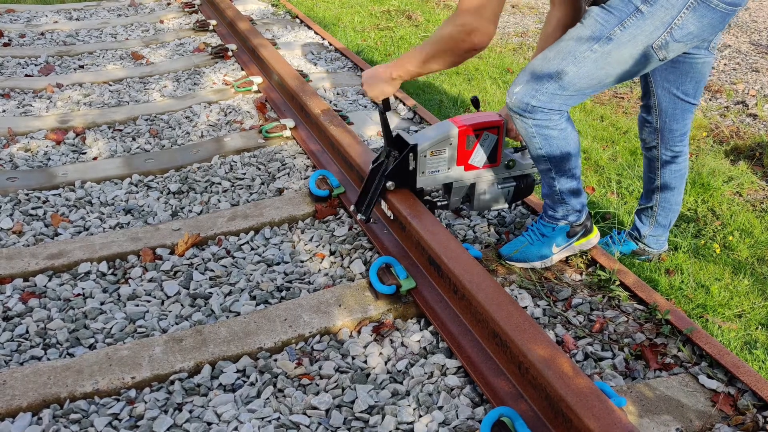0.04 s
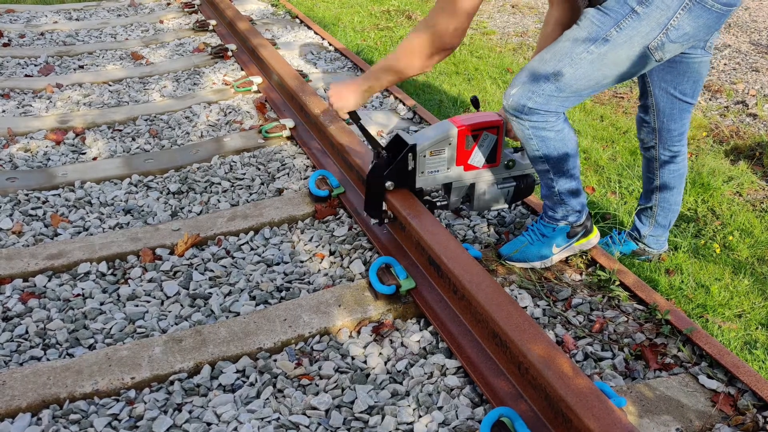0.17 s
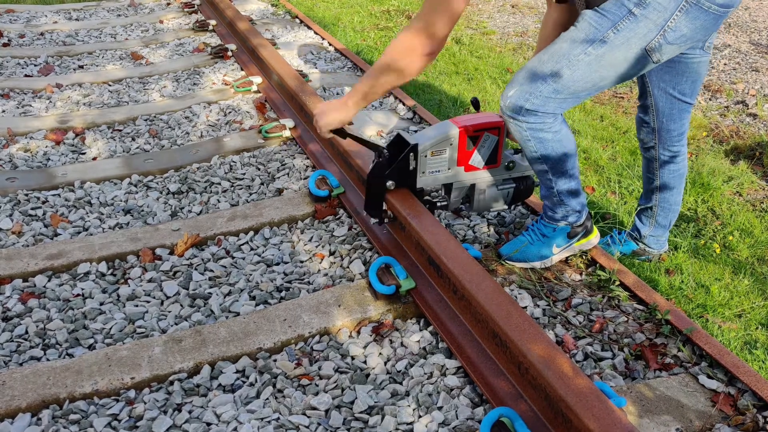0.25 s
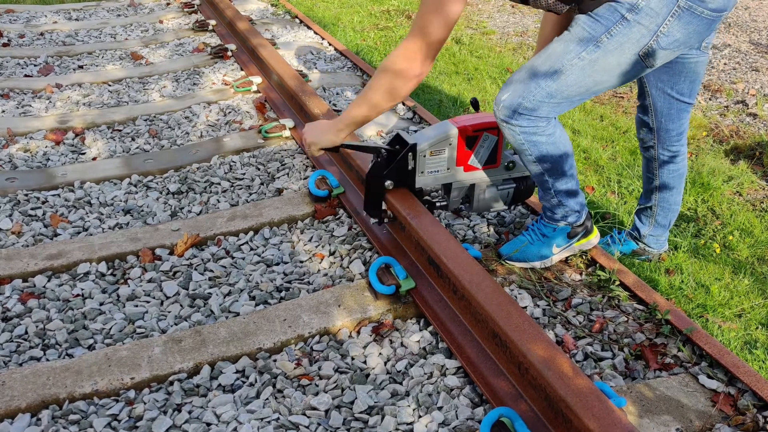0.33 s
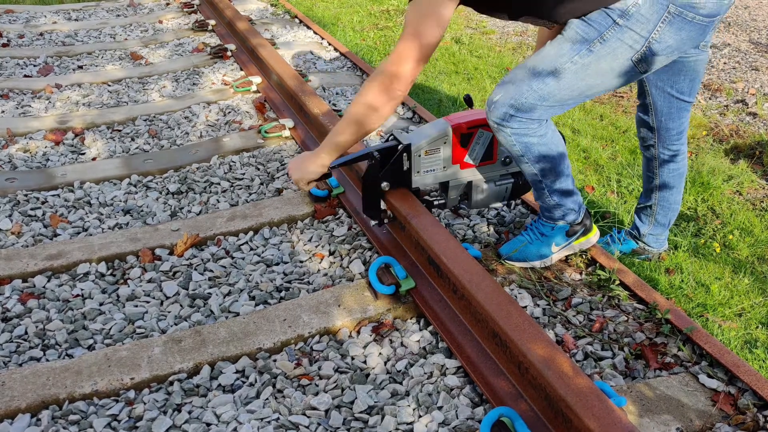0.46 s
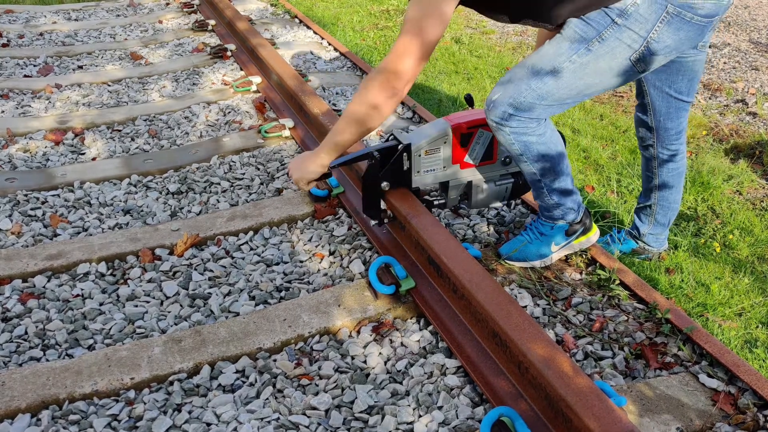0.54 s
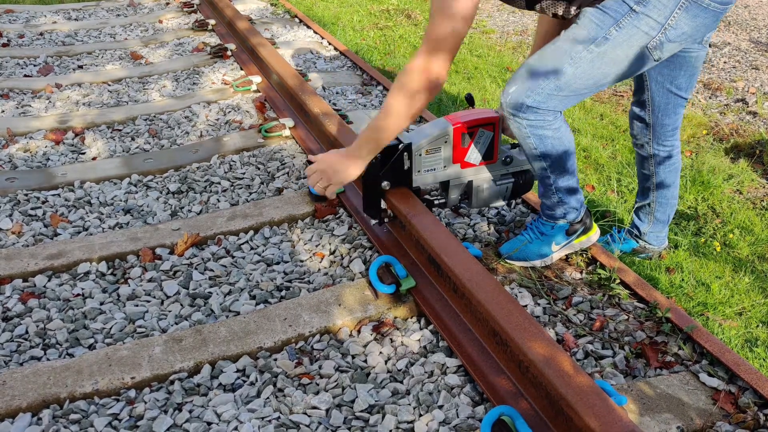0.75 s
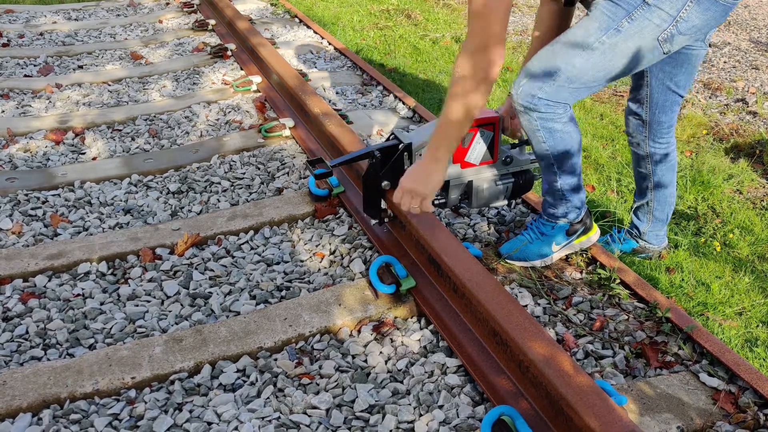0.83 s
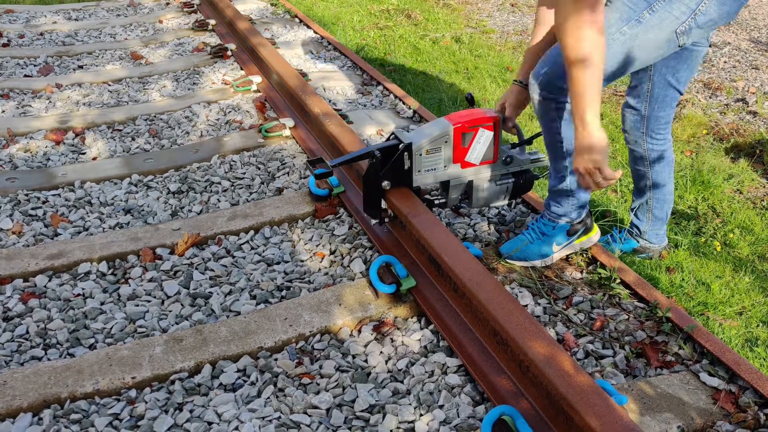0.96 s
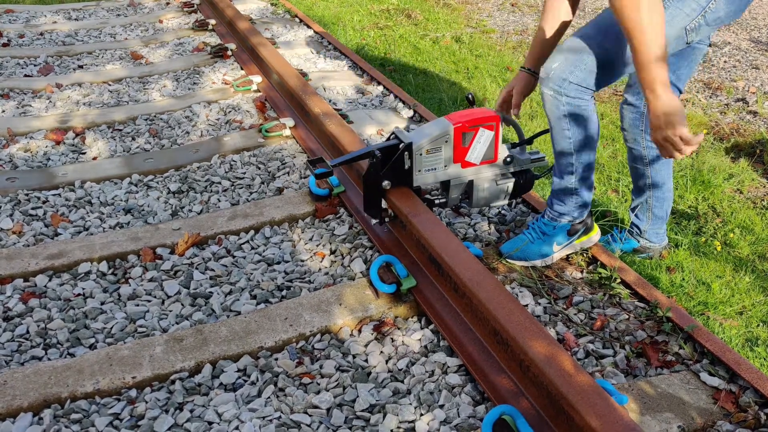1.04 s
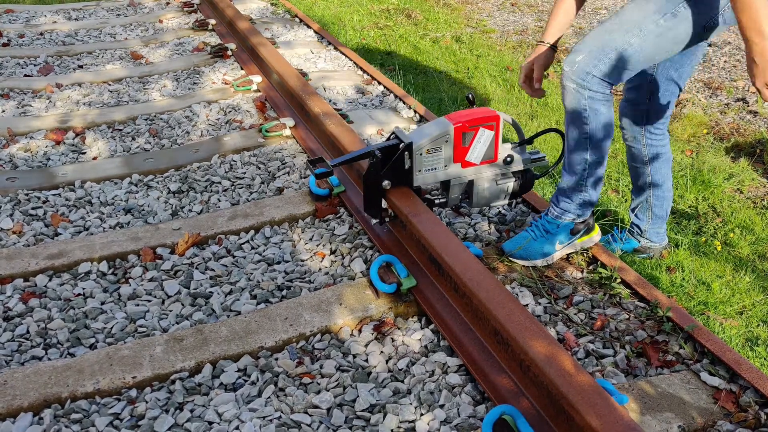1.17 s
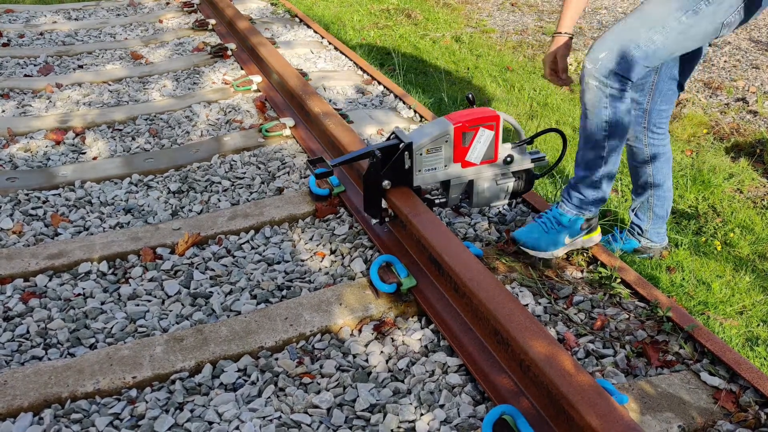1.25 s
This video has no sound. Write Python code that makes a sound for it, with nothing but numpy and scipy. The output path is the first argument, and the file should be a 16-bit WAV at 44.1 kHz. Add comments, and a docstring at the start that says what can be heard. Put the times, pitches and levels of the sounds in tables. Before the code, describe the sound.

Three close metal clacks sound as a lever clamps a machine to a rail, the last loudest, with tiny scrapes between and brief ringing. Afterwards light wind rumbles on the microphone over a quiet, distant trackside hiss.

```python
"""A steel lever swings over and locks a machine's clamp onto a railway rail, heard close by in stereo.
The lever snaps; the jaw knocks on the rail, scrapes, squeaks under load and slams home. Both parts
ring briefly, and the ballast scatters each clack. Out at the trackside, light wind rumbles and
bumps on the microphone over a quiet, distant hiss."""
import sys
import numpy as np
from scipy import signal
from scipy.fft import rfft, irfft
from scipy.io import wavfile
from scipy.ndimage import uniform_filter1d

SR = 44100
rng = np.random.default_rng(int(sys.argv[2]) if len(sys.argv) > 2 else 0)


def to_wav(s):
    """Save 16-bit WAV."""
    ch = np.atleast_2d(s).T  # columns
    pcm = np.round(np.clip(ch, -1, 1) * 32767)  # PCM
    wavfile.write(sys.argv[1], SR, pcm.astype(np.int16))


N = 57330

# how alike steel-on-steel noise is in the two channels: f/Hz, correlation
STEEL_LIKENESS = [(100, 0.63), (1000, 0.95), (2200, 0.15), (12000, 0.11)]
BASS_HZ, TREBLE_HZ, RISE_S = 890, 3840, 0.0011


def amp(db):
    """Decibels to gain."""
    return 10 ** (np.asarray(db) / 20)


def unit_rms(x):
    """Scales to rms 1."""
    return x / np.sqrt(np.mean(x ** 2) + 1e-20)


def curve(points, hz):
    """Reads a table along a log-frequency axis."""
    f, value = np.transpose(points)
    return np.interp(np.log(hz + 1), np.log(f + 1), value)


def pan(db):
    """Constant-power gains for a level of left over right."""
    gains = np.array([amp(np.atleast_1d(db) / 2), amp(-np.atleast_1d(db) / 2)])
    return gains / np.sqrt((gains ** 2).mean(0))


def add(mix, start_s, sound):
    """Mixes in a stereo sound."""
    part = mix[:, max(round(start_s * SR), 0):][:, :sound.shape[1]]
    part += sound[:, :part.shape[1]]


def noise_pair(likeness):
    """Flat spectra of two partly alike noises, left and right."""
    common, separate = np.exp(2j * np.pi * rng.random((2, len(likeness))))
    share = np.clip(likeness, -1, 1)
    return np.array([common, share * common + np.sqrt(1 - share ** 2) * separate])


def bands(hz, count):
    """Pairs of centre and overlapping weights for bands that widen towards the treble."""
    centres = np.geomspace(500, 16500, count) - 400
    return zip(centres, [np.interp(hz, centres, row) for row in np.eye(count)])


def open_air(whirr_width_hz=80):
    """Distant outdoor hiss with a faint whirr in it, mostly to the left."""
    spectrum = [(100, 5), (200, 2), (330, -4.5), (570, 0.5), (750, -8.5), (1150, -8), (1400, -11.5),
                (1750, -10), (2450, -20.5), (3200, -11), (4000, -19.5), (6500, -22.5), (9000, -32.5),
                (14500, -28), (16000, -33)]  # hiss: f/Hz, level/dB
    whirr = [(1640, 8), (2020, 8), (3000, 4)]  # resonances: f/Hz, boost/dB
    balance = [(100, 0.5), (500, 2.5), (1200, 7.5), (6000, 7.5), (12000, 1.5)]  # f/Hz, left over right/dB
    likeness = [(100, 1), (600, 0.5), (1500, 0.032)]  # f/Hz, left-right correlation
    drift = [(0, -46), (.15, -50.5), (.38, -44.5), (.7, -50), (.93, -49.5), (1.05, -50), (1.3, -52.5)]  # t/s, level/dB
    t, hz = np.arange(N) / SR, np.fft.rfftfreq(N, 1 / SR)
    whirr_db = sum(db * np.exp(-((hz - centre) / whirr_width_hz) ** 2) for centre, db in whirr)
    colour = amp(curve(spectrum, hz) + whirr_db) * pan(curve(balance, hz))
    hiss = irfft(noise_pair(curve(likeness, hz)) * colour, N)
    return unit_rms(hiss) * amp(np.interp(t, *np.transpose(drift)))


def wind_rumble():
    """Light wind rumbles on each side of the microphone independently."""
    spectrum = [(10, -24), (25, 3), (45, 7), (70, -8.5), (103, -1.5), (140, -25.5), (190, -9), (260, -58),
                (1000, -53)]  # rumble: f/Hz, level/dB
    gusts = [(0, -44), (.7, -43), (.8, -38.5), (0.999, -32.5), (1.078, -45), (1.3, -38.5)]  # t/s, level/dB
    t, hz = np.arange(N) / SR, np.fft.rfftfreq(N, 1 / SR)
    rumble = irfft(noise_pair(0 * hz) * amp(curve(spectrum, hz)), N)
    return unit_rms(rumble) * amp(np.interp(t, *np.transpose(gusts)))


def crack(bass_db, treble_db, t60, contact_hz, boost_db, pan_db, size=4096):
    """A blow excites a crowd of heavily damped modes; the low ones last slightly longer."""
    spectrum = [(130, -41), (200, -12.5), (280, 5), (450, -3.5), (1000, 2), (1850, 1), (3800, 0),
                (7300, -6), (8400, -13), (10500, -17), (12000, -5.5), (13200, -19), (16000, -16)]  # steel striking steel: f/Hz, level/dB
    t, hz = np.arange(size) / SR, np.fft.rfftfreq(size, 1 / SR)
    tilt_db = bass_db / (1 + (hz / BASS_HZ) ** 2) + treble_db * hz ** 2 / (hz ** 2 + TREBLE_HZ ** 2)
    contact_db = boost_db / (1 + ((hz / contact_hz - 1) / 0.06) ** 2)  # half width 6 % of the pitch
    colour = amp(curve(spectrum, hz) + tilt_db + contact_db)
    noise = noise_pair(curve(STEEL_LIKENESS, hz)) * colour
    out = np.zeros((2, size))
    for centre, weight in bands(hz, count=30):
        band_t60 = t60 * (TREBLE_HZ / (centre + BASS_HZ)) ** 0.03
        envelope = np.minimum(t / RISE_S, 1) * np.exp(-np.log(1000) * t / band_t60)
        band = irfft(noise * np.sqrt(weight)) * envelope
        energy = np.mean(weight * colour ** 2) * np.sum(envelope ** 2)
        sides = pan(pan_db * (0.77 if centre < BASS_HZ else 1))  # bass sits nearer the middle
        out += sides * band * np.sqrt(energy / (np.sum(band ** 2, 1, keepdims=True) + 1e-20))
    return 2 * out


def clang(modes, t60, chatter_s=0.001187, size=4096):
    """The quickly damped modes of a struck part start one by one as the contact chatters."""
    hz, db = np.transpose(modes)[:, :, None]
    age = np.maximum(np.arange(size) / SR - chatter_s * rng.random(hz.shape), 0)
    phase = 0.53 * np.sqrt(hz / TREBLE_HZ) * rng.standard_normal((2, len(modes), 1))
    envelope = amp(db) * np.minimum(age / RISE_S, 1) * np.exp(-np.log(1000) * age / t60)
    return (envelope * np.sin(2 * np.pi * hz * age + phase)).sum(1)


def ring(modes, seated_after_s=np.inf, size=26000):
    """Lasting modes of a steel part; high ones reach the two channels out of step."""
    t = np.arange(size) / SR
    hz, db, t60 = np.transpose(modes)[:, :, None]
    phase = 0.76 * np.sqrt(hz / TREBLE_HZ) * rng.standard_normal((2, len(modes), 1))
    seated_loss = 0.09 * (hz - hz[0]) * np.maximum(t - seated_after_s, 0)  # spares the lowest mode
    envelope = amp(db) * np.minimum(t / RISE_S, 1) * np.exp(-np.log(1000) * t / t60 - seated_loss)
    return (envelope * np.sin(2 * np.pi * hz * t + phase)).sum(1)


def clacks(lever_seated_s=0.58):
    """Each blow cracks on contact, clangs briefly and leaves the lever or clamp ringing."""
    # blows: t/s, part struck, crack level/dB, bass/dB, treble/dB, crack t60 near 3 kHz/s,
    # contact f/Hz, its boost/dB, left over right/dB, clang level/dB, ring level/dB
    blows = [(0.2135, "lever", -17.5, 1, 9.5, .012, 940, -2, 1, -15.5, -34.5),
             (0.3051, "clamp", -26.5, 7.5, -5.5, 0.035, 938, 9, 5.5, -41, -39),
             (0.3118, "clamp", -35, 11, -1.5, 0.041, 203.2, 29, 7.5, -56, -74),
             (0.4596, "clamp", -15, -0.5, -0.5, 0.034, 896, 8.5, 6, -18.5, -23)]
    contacts = [(-.0015, -15), (0, 1), (.0048, -4.5)]  # steel touches, hits and rebounds: delay/s, level/dB
    # quickly damped modes of each part: f/Hz, level/dB
    lever_clang = [(980, -3), (1320, -1), (1620, -5), (2130, -5), (2900, -2), (3150, 0), (3570, -3),
                   (4370, 1), (4730, 2), (5510, 0), (6170, -2), (6830, 3), (7300, 1)]
    clamp_clang = [(400, -4), (810, 0), (1080, 0), (1440, -2), (2270, -2), (3110, 1), (3500, -3),
                   (3820, -1), (4330, 0), (4760, -5), (6030, -4)]
    # lasting modes of the lever and of the clamp on the rail: f/Hz, level/dB, t60/s
    lever_ring = [(468, -5, .66), (1066, -11, .42), (1303, -11, .24), (760, -11, .22), (4210, -5, .34)]
    clamp_ring = [(214, -4, .11), (330, -15, .28), (470, -7, .2), (577, 1, .13), (759, -7, .25),
                  (860, -6, .09), (1174, -13, .18)]
    out = np.zeros((2, N))
    for start_s, part, crack_db, *timbre, pan_db, clang_db, ring_db in blows:
        for delay_s, contact_db in contacts:
            add(out, start_s + delay_s, amp(crack_db + contact_db) * crack(*timbre, pan_db))
        if part == "lever":
            short = clang(lever_clang, t60=0.018)
            lasting = ring(lever_ring, max(lever_seated_s - start_s, 0))
        else:
            short = clang(clamp_clang, t60=0.035)
            lasting = ring(clamp_ring)
        add(out, start_s, amp(clang_db) * pan(pan_db) * short)
        add(out, start_s, amp(ring_db) * pan(pan_db / 2) * lasting)
    return out


def ballast(direct, onset_s=0.0033, size=16384):
    """Stones and sleepers throw a short diffuse tail back to the microphone."""
    spectrum = [(150, -6.5), (600, -3), (2000, -11.5), (5000, -16.5), (14000, -10.5)]  # scattered sound: f/Hz, level/dB
    decay = [(150, 0.12), (1000, 0.16), (5000, 0.19), (14000, 0.055)]  # f/Hz, t60/s
    t, hz = np.arange(size) / SR, np.fft.rfftfreq(size, 1 / SR)
    noise = noise_pair(0 * hz) * amp(curve(spectrum, hz))
    tail = np.zeros((2, size))
    for centre, weight in bands(hz, count=10):
        envelope = np.minimum(t / onset_s, 1) ** 2 * np.exp(-np.log(1000) * t / curve(decay, centre))
        tail += irfft(noise * weight) * unit_rms(envelope)
    return signal.fftconvolve(direct, tail, axes=1)[:, :N]


def scrapes(slips_per_s=2000):
    """Lever and jaw rub as they move: swells of tiny slips, each through one broad resonance."""
    rubs = [(0.287, 0.0018, -40.5, 1390, .7), (0.3382, 0.0024, -36, 1570, 0.46),
            (.4230, 0.004, -36, 3250, 0.23), (.4240, 0.0068, -34, 1230, 0.41),
            (0.4426, 0.0033, -40, 3800, 0.3), (.4470, 0.011, -34, 790, 0.61),
            (0.517, 0.004, -37.5, 2630, .35), (0.534, 0.0042, -40.5, 1050, 0.27)]  # t/s, half length/s, level/dB, f/Hz, half width/octaves
    t, hz = np.arange(N) / SR, np.fft.rfftfreq(N, 1 / SR)
    out = np.zeros((2, N))
    for peak_s, half_s, db, centre_hz, octaves in rubs:
        noise = irfft(noise_pair(curve(STEEL_LIKENESS, hz)), N)
        slips = noise * (rng.random(N) < slips_per_s / SR)
        resonance = 1 / (1 + (np.log2((hz + 1) / centre_hz) / octaves) ** 2)
        rub = irfft(rfft(slips) * resonance, N)
        swell = np.exp(-((t - peak_s) / half_s) ** 2)
        out += amp(db) * unit_rms(rub * swell) * np.sqrt(np.mean(swell ** 2))
    return pan(db=8) * out


def squeak(start_s=0.4125, length_s=0.015, pitch_hz=1790, jitter=0.035):
    """The jaw sticks and slips on the rail as it takes the load: a short, wavering tone."""
    t = np.arange(0, length_s, 1 / SR)
    waver = unit_rms(uniform_filter1d(rng.standard_normal(N), size=40))[:len(t)]
    phase = 2 * np.pi * np.cumsum(pitch_hz * (1 + jitter * waver)) / SR
    tone = np.sin(phase) + amp(-18) * np.sin(2 * phase)
    swell = np.sin(np.pi * t / length_s) ** 2
    out = np.zeros((2, N))
    add(out, start_s, amp(-29) * pan(db=12) * tone * swell)
    return out


def wind_bumps():
    """Eddies hit the microphone: each is a pressure spike inside a wider dip."""
    eddies = [(0.7616, 0.002, -55, -16), (0.815, 0.0038, -56, -22.5), (0.9782, 0.0014, -57, -11.5),
              (0.981, 0.0026, -15, -24)]  # t/s, width/s, left level/dB, right level/dB
    t, out = np.arange(N) / SR, np.zeros((2, N))
    for peak_s, width_s, left_db, right_db in eddies:
        u = (t - peak_s) / width_s
        dip_ahead = 0.27 * np.exp(-(u + 1.08) ** 2)
        wake = 0.46 * np.exp(-(u / 3.57 - 1) ** 2)
        out += amp([[left_db], [right_db]]) * (np.exp(-u ** 2) - dip_ahead - wake)
    return out


def scene():
    """The clamp close by, its scatter off the track bed, distant hiss and wind on the microphone."""
    clamp = clacks() + scrapes() + squeak()
    return clamp + ballast(clamp) + open_air() + wind_rumble() + wind_bumps()


def record(dry, cutoff_hz=16200):
    """The recorder's band limit."""
    lowpass = signal.firwin(255, cutoff_hz, window=("kaiser", 9), fs=SR)
    return signal.oaconvolve(dry, lowpass[None], "same")


dry = scene()
out = record(dry)
to_wav(out)
```